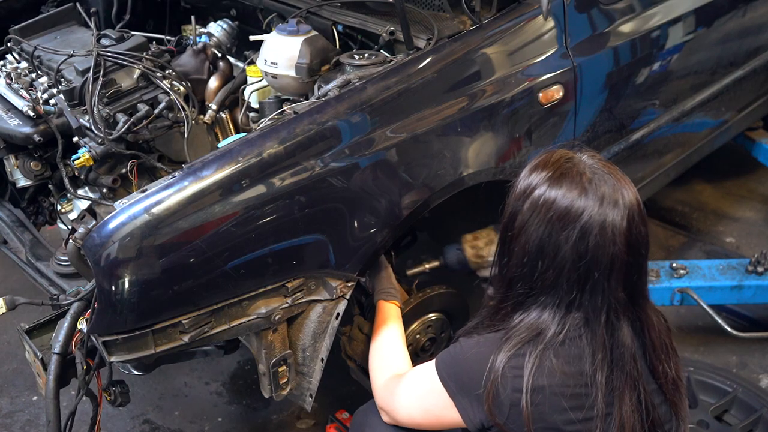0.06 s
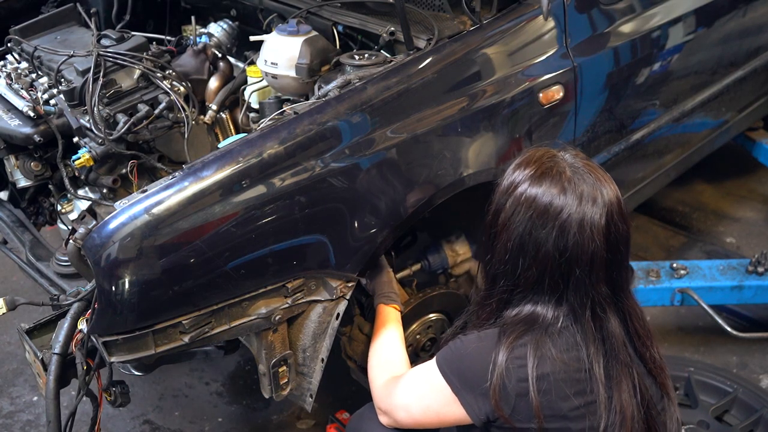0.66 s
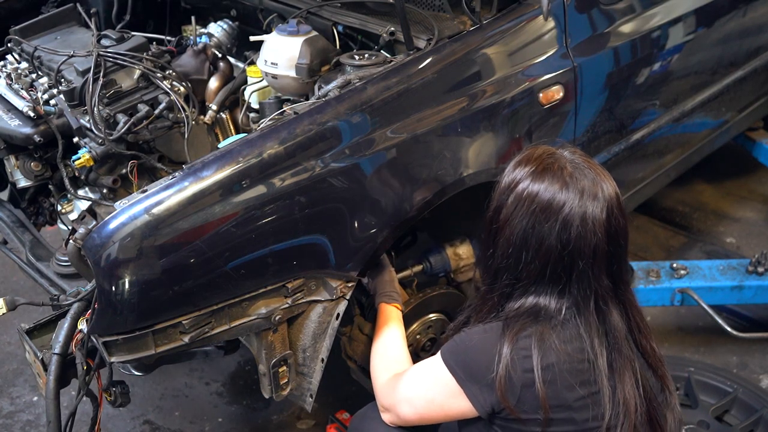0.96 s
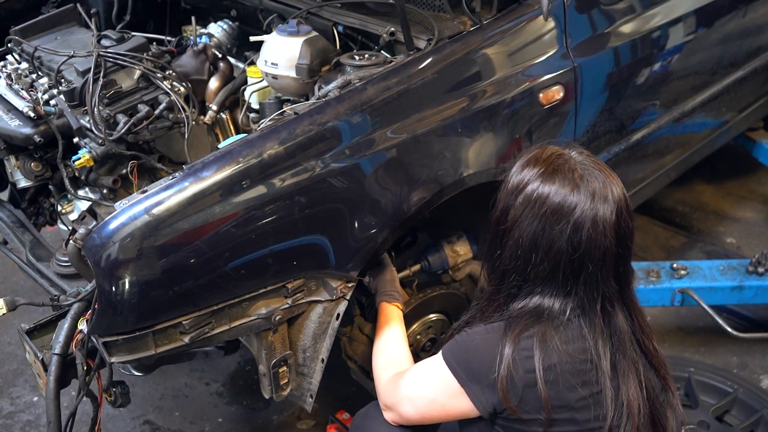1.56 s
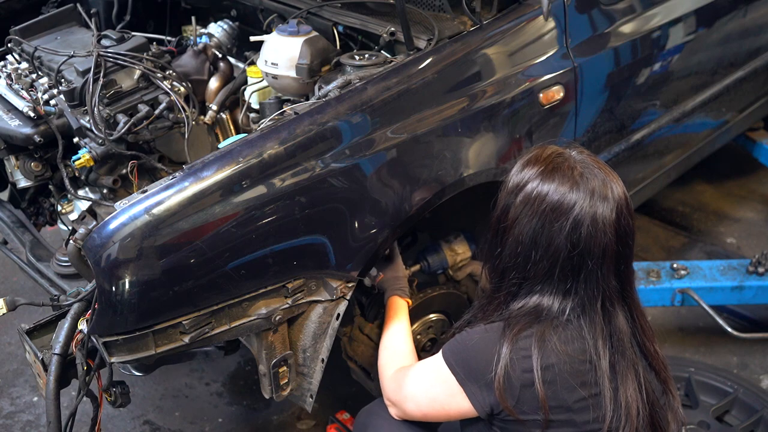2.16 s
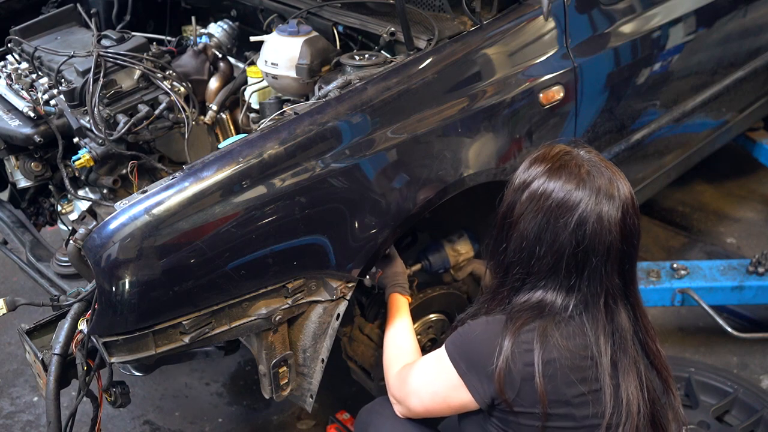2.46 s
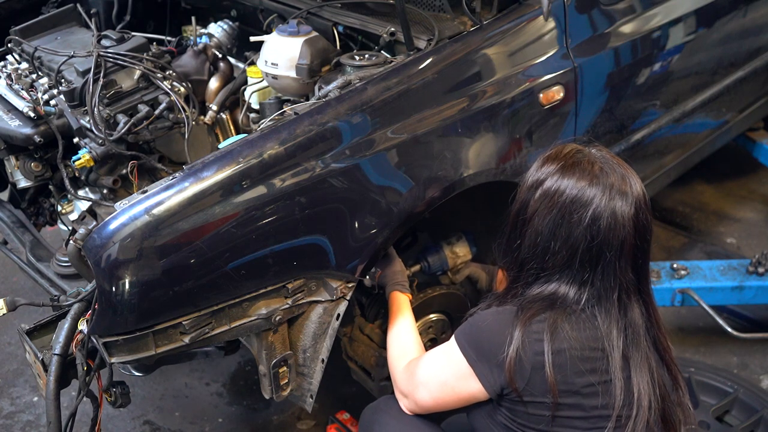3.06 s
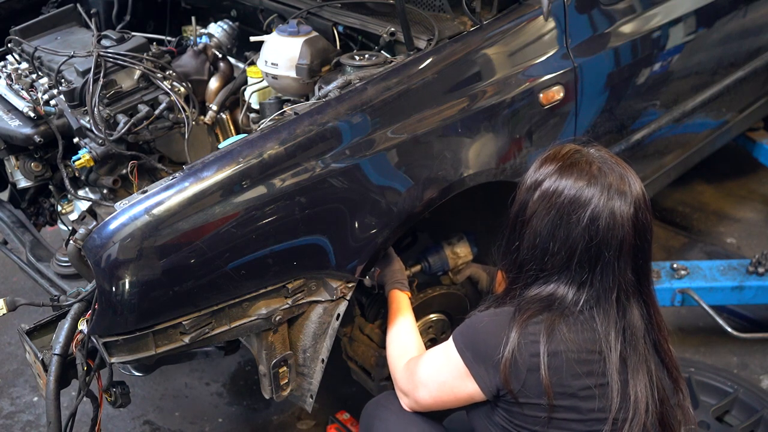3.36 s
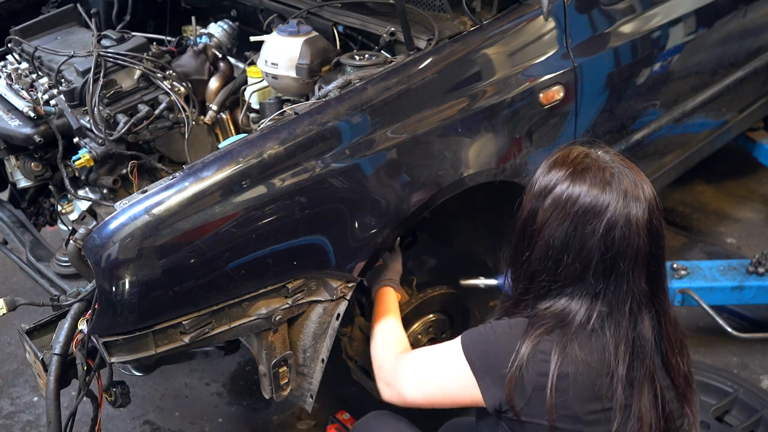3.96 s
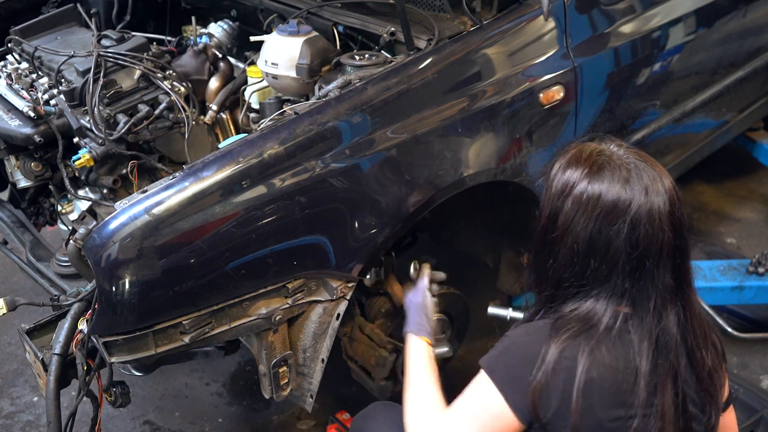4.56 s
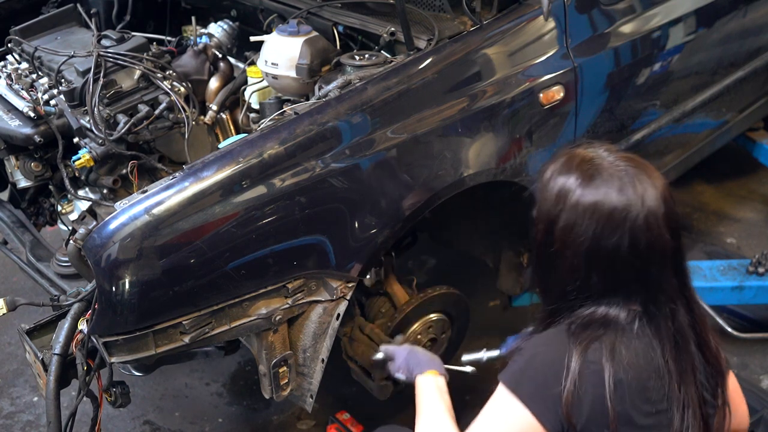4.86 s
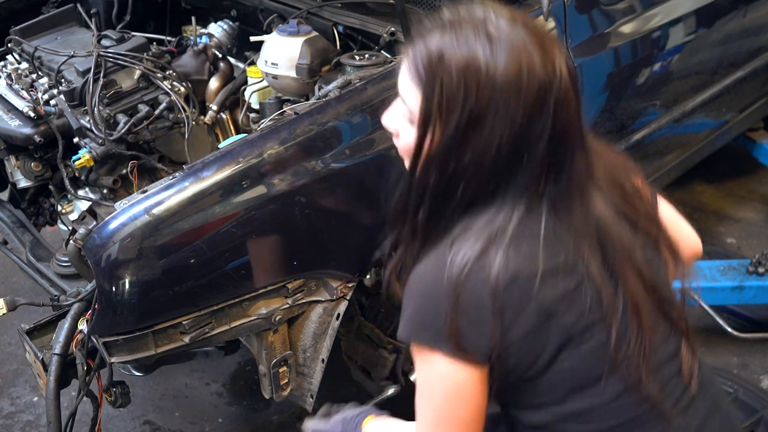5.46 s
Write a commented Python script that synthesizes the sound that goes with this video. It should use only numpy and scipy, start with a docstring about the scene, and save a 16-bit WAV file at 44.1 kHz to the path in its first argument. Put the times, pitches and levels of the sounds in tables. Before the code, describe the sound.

Faint metal clacks, then two loud rattling bursts from a pneumatic impact wrench, followed by scattered tool knocks in a workshop.

```python
"""An air-powered impact wrench hammers on a suspension bolt in a wheel arch, in an echoing garage.
The socket is set on the bolt, a fast burst and a slower, heavier burst follow, then the tools come off.
Each blow cracks, rattles the socket and rings the steel. Once the bolt binds, every blow stalls the air
motor, which spins up again and puffs out air before the next one. The workshop hums faintly behind."""
import sys
import numpy as np
from scipy import signal
from scipy.fft import rfft, irfft
from scipy.io import wavfile
from scipy.ndimage import uniform_filter1d

SR = 44100
rng = np.random.default_rng(int(sys.argv[2]) if len(sys.argv) > 2 else 0)


def store_wav(level_fs):
    """Save 16-bit WAV to argv[1]."""
    pcm = np.round(np.clip(np.atleast_2d(level_fs), -1, 1) * 32767)
    wavfile.write(sys.argv[1], SR, pcm.T.astype(np.int16))


N = 243207
T = np.arange(N) / SR
VANES = 7  # blades on the air motor's rotor
STALL_RATE, COAST_RATE = 25, 26  # turns per second: slower counts as stalling; spinning freely

# Tone colours of the noises. Each row: pitch in Hz, relative level in dB.
HUM_COLOUR = [(20, -6), (60, -13.5), (115, 3), (160, -11), (250, -16), (450, -4.5), (700, -12), (1300, -11),
              (2700, -20), (5500, -23.5), (7500, -48), (13000, -65)]
ROOM_HISS_COLOUR = [(1000, -15.5), (3000, 7), (5500, 5.5), (7000, -2), (11000, -7), (15500, -10.5)]
RUMBLE_COLOUR = [(8, 0), (20, -2.5), (35, -29.5), (60, -13.5), (150, -65)]
ECHO_COLOUR = [(70, -9.5), (250, 2), (500, 1), (1800, 4.5), (4800, 1), (8000, 2.5), (14000, -3.5)]
CLACK_COLOUR = [(200, -30), (500, -8.5), (850, 2), (1300, 4), (2000, 1.5), (2900, 1.5), (4500, -8),
                (7000, -22), (15000, -75)]
THUD_COLOUR = [(30, -33), (70, -1.5), (120, -2.5), (165, -3), (205, -8.5), (280, -2.5), (350, -8),
               (550, -10), (1200, -23.5), (4000, -66)]
TICK_COLOUR = [(1000, -36), (3000, -3), (5200, 3), (7500, -9), (11000, -12.5), (15500, -27)]
WHIRR_COLOUR = [(200, -23), (700, -7), (1200, -2.5), (1900, -2), (2600, -4.5), (4500, -7), (9000, -30.5),
                (15000, -49.5)]
AIR_COLOUR = [(60, -42.5), (190, -17), (380, 5), (700, -5), (1000, 6.5), (1800, 0), (2700, 2.5), (3500, 6),
              (4300, 2.5), (5500, 4), (7000, -3.5), (10000, -6.5), (15500, -15)]
CRACK_COLOUR = [(100, -40), (200, -26.5), (290, -13), (400, -11), (700, 1.5), (1000, -2.5), (2000, 4),
                (4300, 3.5), (5400, 5), (7000, -2), (10000, -4), (12500, -5), (15700, -14)]
SIZZLE_COLOUR = [(3000, -20.5), (6500, -4.5), (9500, 6.5), (15500, -6.0)]
# The background. Each row: time in seconds, hiss level in dB, rumble level in dB.
BACKGROUND_LEVELS = [(.14, -57, -41), (.22, -59, -41.5), (.65, -66, -47), (.8, -55, -39),
                     (1.12, -51, -50.5), (4.4, -71, -71.5), (4.85, -62.5, -66), (5.5, -55, -39)]
# The garage's echo. Each row: pitch in Hz, fade time in seconds (the time to fall 60 dB, or "t60").
ECHO_FADES = [(70, 2), (300, 1.92), (700, 1.27), (1800, 1.22), (4800, 0.92), (8000, 0.66), (13000, 0.33)]
# Tool knocks. Each row: start in seconds, relative dB of clack, thud, tick and ring, part struck.
KNOCKS = [(0.164, -40, -31, -50, -38, "hub"), (0.299, -16, -30, -41, -37.5, "socket"),
          (0.335, -23, -31, -44, -51, "socket"), (0.364, -20, -28, -40, -52, "socket"),
          (0.391, -15, -18.5, -29.5, -36, "socket"), (0.694, -21, -27.5, -44, -53.5, "socket"),
          (0.73, -19, -22.5, -27.5, -33.5, "anvil"), (0.778, -45, -29.5, -43, -44, "hub"),
          (0.936, -32, -39, -33, -47, "nut"), (0.975, -31, -57, -44, -45, "hub"),
          (3.788, -21, -49, -25, -65, "nut"), (3.924, -24, -30, -40, -49, "anvil"),
          (3.968, -17, -46, -32, -29, "anvil"), (4.017, -49, -28.5, -58, -52, "hub"),
          (4.257, -38, -21, -58, -26, "hub"), (4.622, -37.5, -61.5, -44, -60, "nut"),
          (4.679, -26.5, -18, -40.5, -34, "spanner"), (4.711, -35, -26.5, -40.5, -50, "hub"),
          (4.822, -41, -28.5, -53, -58, "hub"), (4.901, -40.5, -26, -52, -55, "hub"),
          (5.012, -26.5, -35, -28.5, -39.5, "nut"), (5.107, -48, -27, -60.5, -57, "hub"),
          (5.23, -34, -29, -46, -40, "nut"), (5.282, -41, -26, -50, -59, "hub"),
          (5.352, -46, -35, -60, -46, "hub"), (5.41, -24.5, -18, -41, -24, "hub")]
# Clatter after a knock. Each entry: part struck, fade time of its clack in seconds.
CLATTER_FADES = {"socket": 0.065, "anvil": 0.077, "nut": .085, "spanner": 0.083, "hub": 0.085}
# The notes of those parts. Each row: pitch in Hz, relative level in dB, fade time in seconds, part.
PART_NOTES = [(1216, -13, .47, "socket"), (1762, -2, .18, "socket"), (1890, -3, .21, "socket"),
              (2780, -4.5, .28, "socket"), (5750, -25, .4, "socket"), (14700, -29, .16, "socket"),
              (2330, 8.5, .053, "anvil"), (14700, -32, .18, "anvil"), (2850, 1, .1, "nut"),
              (6150, -8.5, 0.029, "nut"), (698, -1, 0.045, "hub"), (1198, -8.5, 0.053, "hub"),
              (1272, -5.5, .38, "spanner"), (2020, -2.5, 0.095, "spanner"), (3660, -13, 0.36, "spanner"),
              (3970, -12, 0.91, "spanner"), (3910, 6.5, 0.1, "spanner")]
# Trigger pulls. Each row, in seconds: pressed, valve fully open, first blow, eased off, let go.
PULLS = [(1.163, 1.184, 1.2373, 2.008, 2.133), (2.474, 2.497, 2.541, 3.52, 3.542)]
# Hammer speed, which halves once the bolt binds. Each row: time in seconds, blows per second.
BLOW_RATES = [(1.24, 37.7), (1.36, 40.5), (1.43, 37.1), (1.65, 40.6), (1.88, 39.6), (1.89, 19.3),
              (2.01, 19.6), (2.04, 15.9), (2.54, 19.64), (2.68, 19.57), (3.15, 17.71), (3.396, 18.72),
              (3.45, 14.83)]
# The notes of socket, bolt and hub. Each row: pitch in Hz, fade time in seconds, relative dB in the
# fast burst, relative dB in the slow burst.
STEEL_NOTES = [(956, 0.048, -36.5, -17.5), (1213, .08, -19, -19.5), (1810, 0.24, -29, -34.5),
               (1813, 0.11, -18, -17), (1864, 0.045, -15, -20.5), (2630, .06, -27, -26.5),
               (3490, .04, -20.5, -25), (3563, .015, -16, -10.5), (4250, 0.16, -35.5, -31.5),
               (5080, .011, -24, -9), (5180, 0.012, -18, -16.5), (5680, 0.032, -26, -19.5),
               (5496, 0.018, -8, -25.5), (9390, 0.01, -15, -14.5), (10900, .015, -33.5, -28.5),
               (12100, .015, -27, -28.5)]
# The motor's whine in the fast burst. Each row: time in seconds, pitch in Hz, level in dB.
WHINE_PATH = [(1.17, 250.8, -50), (1.222, 517.7, -13), (1.26, 564, -33), (1.34, 645, -34),
              (1.459, 565, -25.5), (1.521, 636, -31.5), (1.88, 650, -39), (1.929, 498, -57)]
# A slower rotor dumps more air per vane. Each row: turns per second, relative dB of hiss and of pulse.
AIR_PER_VANE = [(12.96, -10.5, -12), (15.3, -15.5, -9.5), (17.7, -15, -9.5), (18.87, -15.5, -11),
                (39, -18, -40)]
# The notes of air outlet and wheel arch. Each row: pitch in Hz, fade time in seconds, relative dB.
OUTLET_NOTES = [(62, 0.16, -19.5), (90.5, 0.28, -18.5), (138, 0.058, -10), (225.3, 0.028, -12.5),
                (381.6, 0.08, -13), (406, 0.067, -11.5), (527, 0.04, -11.5), (586.3, 0.13, -17.5),
                (690, 0.019, -9), (904, 0.053, -13.5), (1020, 0.034, -14)]
# How firmly the socket sits. Each row: time in seconds, relative dB of the blows, extra dB for treble.
SOCKET_GRIP = [(1.24, -9, -1.5), (1.43, -7.5, -11.5), (1.6, -4.5, -15.5), (1.68, -10, -3),
               (1.75, -4.5, -12.5), (1.88, -6.5, -17), (1.96, 0, -22), (2.54, -6.5, -9), (3.06, -4.5, -15),
               (3.25, -6.5, 2.5), (3.5, -3.5, -17)]


def amp(db):
    """Turns decibels into a factor to multiply by."""
    return 10 ** (np.asarray(db) / 20)


def evened(x):
    """Scales a signal to an average power of 1."""
    return x / np.sqrt(np.mean(x ** 2) + 1e-20)


def look_up(table, hz):
    """Reads between a table's rows, giving each octave about equal room."""
    pitches, values = np.transpose(table)
    return np.interp(np.log(hz + 1), np.log(pitches + 1), values)


def add(mix, start_s, sound):
    """Mixes a sound in at its start time."""
    part = mix[round(start_s * SR):][:len(sound)]
    part += sound[:len(part)]


def noise(colour):
    """Steady noise with the given tone colour."""
    gains = amp(look_up(colour, np.fft.rfftfreq(N, 1 / SR)))
    return evened(irfft(rfft(rng.standard_normal(N)) * gains, N))


def wander(length, size):
    """A smooth random drift that changes over about `size` samples."""
    return evened(uniform_filter1d(uniform_filter1d(rng.standard_normal(length), size), size))


def strikes(starts, levels_db, t60s, rise_s):
    """The loudness outline of a row of hits, each rising quickly and dying away."""
    t, outline = np.arange(SR // 2) / SR, np.zeros(N)
    for start, db, t60 in np.broadcast(starts, levels_db, t60s):
        add(outline, start, amp(db - 60 * t / max(t60, .004)) * (1 - np.exp(-t / rise_s)))
    return outline


def ring(force, hz, t60):
    """One fading note, set ringing by a force."""
    t = np.arange(SR // 3) / SR
    return signal.oaconvolve(force, amp(-60 * t / t60) * np.sin(2 * np.pi * hz * t))[:N]


def workshop():
    """A faint hiss that comes and goes, a hum that partly follows it, and a deep rumble."""
    times, hiss_db, rumble_db = np.transpose(BACKGROUND_LEVELS)
    hum_db = -51.5 + 0.57 * (hiss_db - hiss_db.mean())
    layers = (hum_db, HUM_COLOUR), (hiss_db, ROOM_HISS_COLOUR), (rumble_db, RUMBLE_COLOUR)
    return sum(amp(np.interp(T, times, db)) * noise(colour) for db, colour in layers)


def garage_echo(sound, build_s=0.0066):
    """The garage answers with a wash of echo that builds quickly and loses its treble first."""
    hz, t, bands = signal.stft(rng.standard_normal(2 * SR), SR, nperseg=256)
    db = look_up(ECHO_COLOUR, hz)[:, None] - 60 * t / look_up(ECHO_FADES, hz)[:, None]
    tail = signal.istft(bands * amp(db) * (1 - np.exp(-t / build_s)), SR, nperseg=256)[1]
    return signal.fftconvolve(sound, tail / np.linalg.norm(tail))[:N]


def panel_boom(hz=203, t60=0.2, rise_s=0.024):
    """Knocks on the hub, and the spanner coming off, make the car's wing panel boom at its low note."""
    t, booms = np.arange(SR // 2) / SR, np.zeros(N)
    for start, _, thud_db, _, _, part in KNOCKS:
        if part in ("hub", "spanner"):
            pitch = hz * (1 + 0.049 * rng.standard_normal())
            outline = amp(thud_db - 3 - 60 * t / t60) * (1 - np.exp(-t / rise_s))
            add(booms, start, outline * np.sin(2 * np.pi * pitch * t))
    return booms


def tool_knocks():
    """Tools knock on the suspension: a clack, a dull thud, a bright tick and the struck part's ring."""
    starts, clack_db, thud_db, tick_db, ring_db, parts = map(np.array, zip(*KNOCKS))
    clatter_t60 = np.array([CLATTER_FADES[part] for part in parts])
    knocks = strikes(starts, clack_db - 4, clatter_t60, rise_s=0.0049) * noise(CLACK_COLOUR)
    knocks += strikes(starts, thud_db - 1, 1.36 * clatter_t60, rise_s=0.0091) * noise(THUD_COLOUR)
    knocks += strikes(starts, tick_db, 0.67 * clatter_t60, rise_s=0.00223) * noise(TICK_COLOUR)
    t = np.arange(SR) / SR
    for hz, db, t60, part in PART_NOTES:
        waver = 1 + wander(SR, size=300) + 1j * wander(SR, size=300)  # like a cluster of close notes
        outline = amp(db - 60 * t / t60) * (1 - np.exp(-t / 0.0034))
        note = outline * (waver * np.exp(2j * np.pi * hz * t)).imag
        for start, level_db in zip(starts[parts == part], ring_db[parts == part]):
            add(knocks, start, amp(level_db) * note)
    return knocks


def trigger(ease_s=0.046, release_db_per_s=419.5):
    """How much air the trigger lets through, and how far it is eased off, both from 0 to 1."""
    air, eased = np.zeros(N), np.zeros(N)
    for pressed, opened, _, eased_at, released in PULLS:
        air += (T >= opened) * amp(-release_db_per_s * np.maximum(T - released, 0))
        eased = np.where(T >= pressed, np.clip((T - eased_at) / ease_s, 0, 1), eased)
    return air, eased


def rotor_turns(pull):
    """The times that mark off the rotor's turns in one pull; all but the first and last are blows."""
    pressed, _, first_blow, _, released = pull
    marks = [pressed, first_blow]
    while marks[-1] < released:
        marks.append(marks[-1] + 1 / np.interp(marks[-1], *np.transpose(BLOW_RATES)))
    return np.array(marks)


def vane_passes(jitter=0.0075):
    """When each vane passes the outlet, how far round the turn it is, and the turns per second."""
    share, passes = np.arange(1, VANES + 1) / VANES, []
    for marks in map(rotor_turns, PULLS):
        for start, end in zip(marks, marks[1:]):
            rate = 1 / (end - start) if end < marks[-1] else COAST_RATE
            when = np.sqrt(share) if rate < STALL_RATE else share  # a stalled rotor speeds up from rest
            times = start + (end - start) * (when + jitter * rng.standard_normal(VANES))
            passes.append([times, share, np.full(VANES, rate)])
    return np.hstack(passes)


def steel_ring(outline):
    """A noisy push rings the steel; the socket sits differently on each pull, so the mix changes."""
    force = outline * rng.standard_normal(N)
    second_pull = T > PULLS[1][0]
    ringing = np.zeros(N)
    for hz, t60, fast_db, slow_db in STEEL_NOTES:
        balance = np.sqrt(4 * np.log(1000) / (SR * t60))  # equal power for long and short notes
        ringing += amp(np.where(second_pull, slow_db, fast_db)) * balance * ring(force, hz, t60)
    return ringing


def valve_whirr(db=-17.5, rise_s=0.12, release_db_per_s=200):
    """As the first pull is eased off, the half-closed valve whirrs, swelling until it is let go."""
    _, _, _, eased_at, released = PULLS[0]
    swell = np.clip((T - eased_at) / rise_s, 0, 1)
    return swell * amp(db - release_db_per_s * np.maximum(T - released, 0)) * noise(WHIRR_COLOUR)


def valve_spit(leak_db=(-36.5, -22.5)):
    """The valve leaks more and more as it opens; then air spits past and thumps into the resting motor."""
    pressed, opened, *_ = np.transpose(PULLS)
    leak = sum(amp(np.interp(T, span, leak_db, left=-120, right=-120)) for span in zip(pressed, opened))
    rush = strikes(opened, levels_db=0, t60s=0.21, rise_s=0.0054)
    flow = leak + amp(-9.5) * rush
    spit = flow * noise(AIR_COLOUR) + amp(-3) * steel_ring(flow)
    thump = amp(-19.5) * rush * noise(THUD_COLOUR)
    return spit + thump


def motor_whine(waver=0.028):
    """The rotor sings while it keeps spinning between fast blows; its pitch sags as the bolt binds."""
    times, hz, db = np.transpose(WHINE_PATH)
    pitch = np.interp(T, times, hz) * (1 + waver * wander(N, size=250))
    angle = 2 * np.pi * np.cumsum(pitch) / SR
    tone = np.sin(angle) + amp(-2) * np.sin(2 * angle) + amp(-13) * np.sin(angle / 2)
    return amp(np.interp(T, times, db, left=-120, right=-120)) * tone


def exhaust(leak=0.15, last_vane_db=-8, open_treble_db=2, eased_treble_db=-15, eased_hiss_db=5):
    """Each vane lets out a puff of hiss and a pressure pulse; after a stall the air surges mid-turn."""
    times, share, rate = vane_passes()
    air, eased = trigger()
    rates, *levels = np.transpose(AIR_PER_VANE)
    flow_db, push_db = (np.interp(rate, rates, column) for column in levels)
    stalled = rate < STALL_RATE
    surge_db = stalled * (12 * np.exp(-((share - .48) / .22) ** 2) - 6.5)
    puffs = strikes(times, surge_db, t60s=0.02, rise_s=0.00058)
    flow = air * amp(np.interp(T, times, flow_db) - 1 + eased_hiss_db * eased) * (leak + puffs)
    hiss = flow * noise(AIR_COLOUR) + amp(-4) * steel_ring(flow)
    treble = signal.sosfiltfilt(signal.butter(2, 4500, "high", fs=SR, output="sos"), hiss)
    treble_db = open_treble_db * (1 - eased) + eased_treble_db * eased
    hiss += (amp(treble_db) - 1) * treble  # an eased trigger dulls the hiss
    pulses, at = np.zeros(N), np.round(times * SR).astype(int)
    pulses[at] = air[at] * amp(push_db - 3 + surge_db / 2 + last_vane_db * stalled * (share == 1))
    buzz = sum((-1) ** k * amp(db) * ring(pulses, hz, t60)
               for k, (hz, t60, db) in enumerate(OUTLET_NOTES))
    return hiss + buzz


def hammer(wound_up_db=4.5, eased_blow_db=-8.5, eased_treble_db=-8, scatter_db=1.15, rise_s=0.0004):
    """Once a turn, the hammer snaps on the wrench's anvil, rattles the socket and rings the steel."""
    blows = [(marks[1:-1], np.diff(marks)[:-1]) for marks in map(rotor_turns, PULLS)]
    starts, turn_s = np.hstack(blows)
    grip_times, *grip = np.transpose(SOCKET_GRIP)
    firm_db, bright_db = (np.interp(starts, grip_times, column) for column in grip)
    eased = np.interp(starts, T, trigger()[1])
    from_rest = 1 / turn_s < STALL_RATE  # a blow wound up from rest hits harder
    db = firm_db + wound_up_db * from_rest + eased_blow_db * eased
    db += scatter_db * rng.standard_normal(len(starts))
    rattle_t60 = 0.022 * 2 ** (-firm_db / 4)  # a firm socket rattles more briefly
    rattle = strikes(starts, db - 9, rattle_t60, rise_s)
    snap = strikes(starts, db - 6, t60s=0.019, rise_s=rise_s)
    sizzle_db = db + bright_db - 10 + eased_treble_db * eased
    sizzle = strikes(starts, sizzle_db, rattle_t60, rise_s) * noise(SIZZLE_COLOUR)
    impact = rattle + snap
    return impact * noise(CRACK_COLOUR) + sizzle + amp(-1) * steel_ring(impact)


def scene(wrench_echo_db=-6, tools_echo_db=-10):
    """The wrench and the tools, heard directly and as echo, over the workshop background."""
    wrench = hammer() + exhaust() + motor_whine() + valve_spit() + valve_whirr()
    tools = tool_knocks() + panel_boom()
    echo = garage_echo(amp(wrench_echo_db) * wrench + amp(tools_echo_db) * tools)
    return (wrench + tools + echo + workshop())[None]


def record(dry, threshold_db=-11, squeeze=0.12, recovery_db_per_s=160, ceiling=0.94, top_hz=15900):
    """A limiter dips the level after hard blows, peaks are rounded off and the top treble is cut."""
    memory = np.exp(-1 / (.005 * SR))
    smoother = [1 - memory], [1, -memory]  # averages over about 5 milliseconds
    power_db = 10 * np.log10(signal.lfilter(*smoother, dry[0] ** 2) + 1e-12)
    fall_db = recovery_db_per_s * T
    held_db = np.maximum.accumulate(power_db + fall_db) - fall_db  # jumps to each peak, then sinks
    over_db = np.maximum(held_db - threshold_db, 0)
    dipped = dry / amp(squeeze * signal.lfilter(*smoother, over_db))
    rounded = dipped / (1 + (dipped / ceiling) ** 12) ** (1 / 12)
    treble_cut = signal.firwin(511, top_hz, window=("kaiser", 9), fs=SR)
    return signal.oaconvolve(rounded, treble_cut[None], "same")


dry = scene()
out = record(dry)
store_wav(out)
```